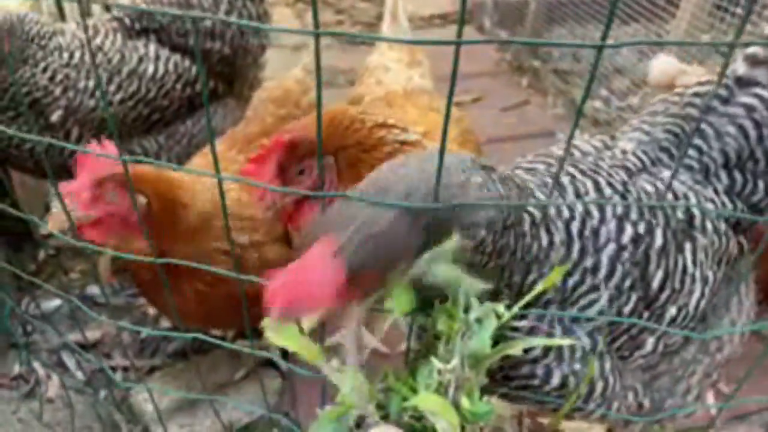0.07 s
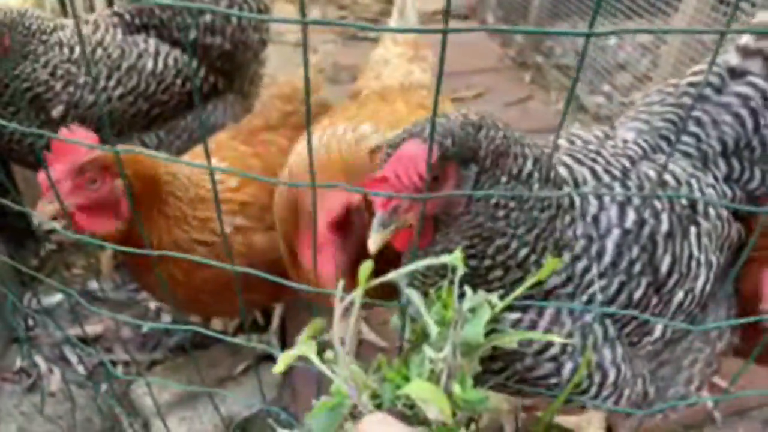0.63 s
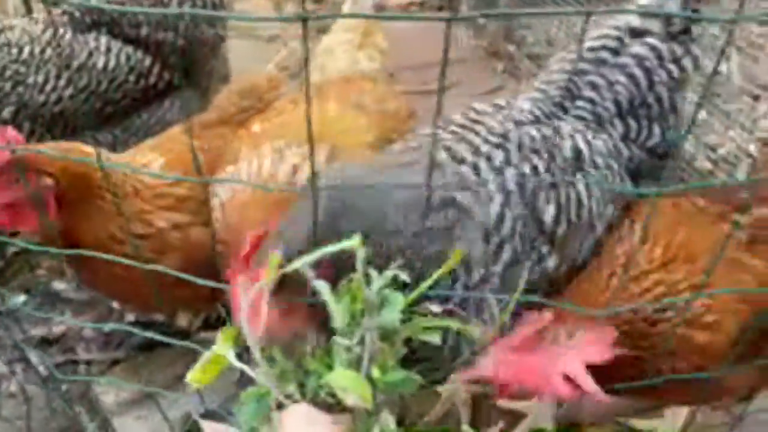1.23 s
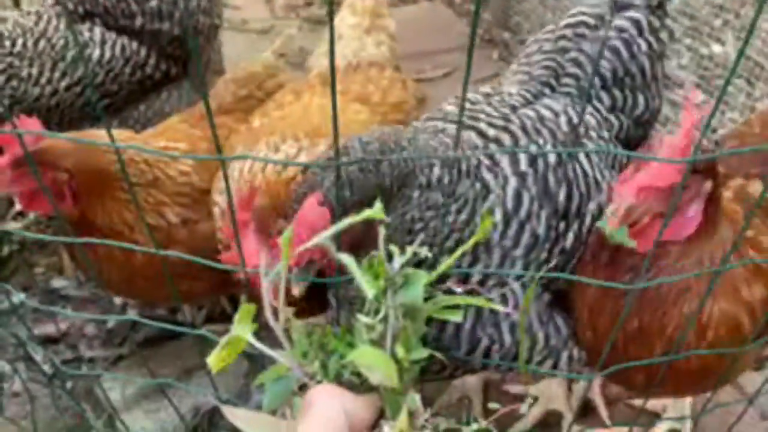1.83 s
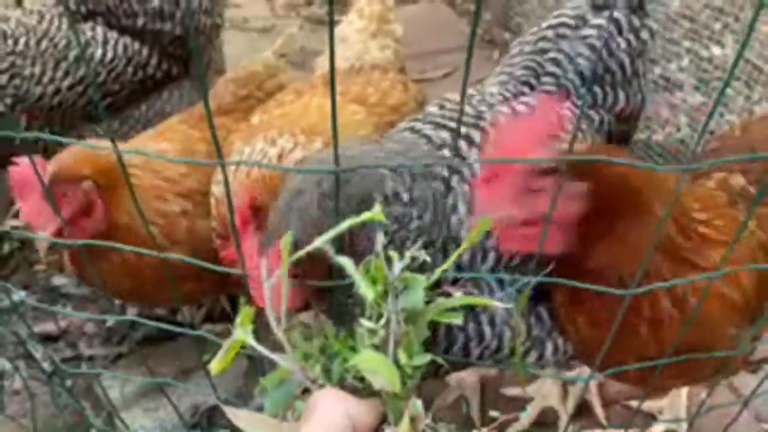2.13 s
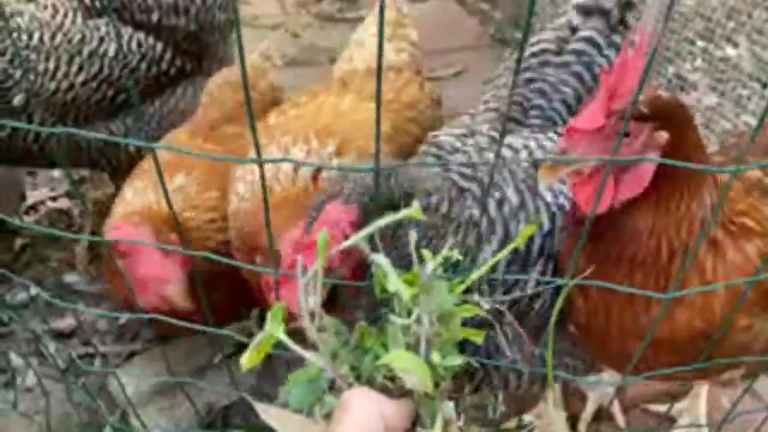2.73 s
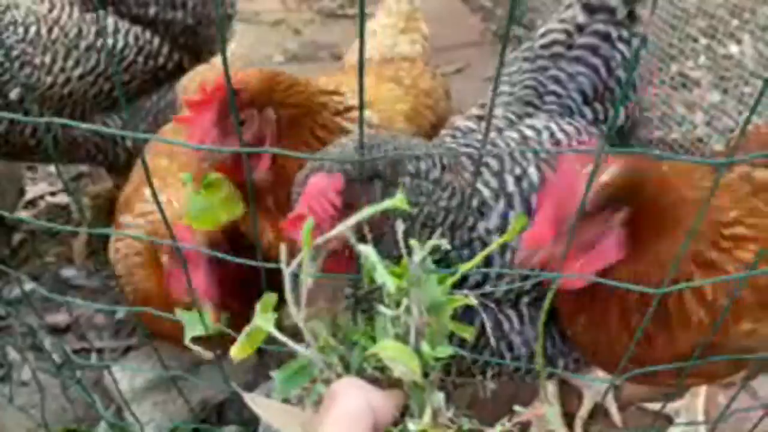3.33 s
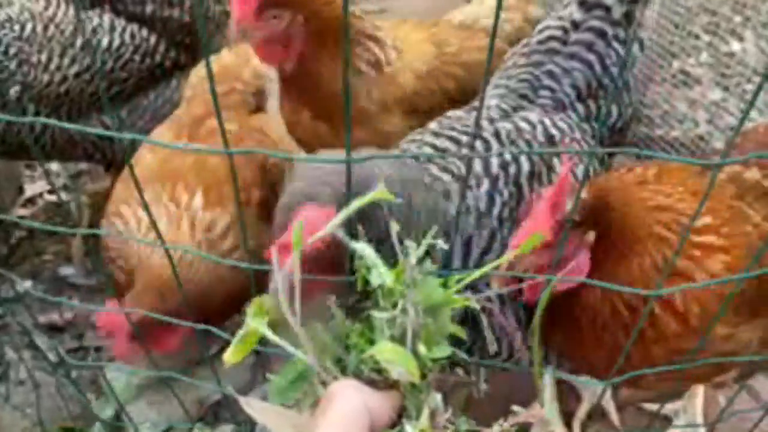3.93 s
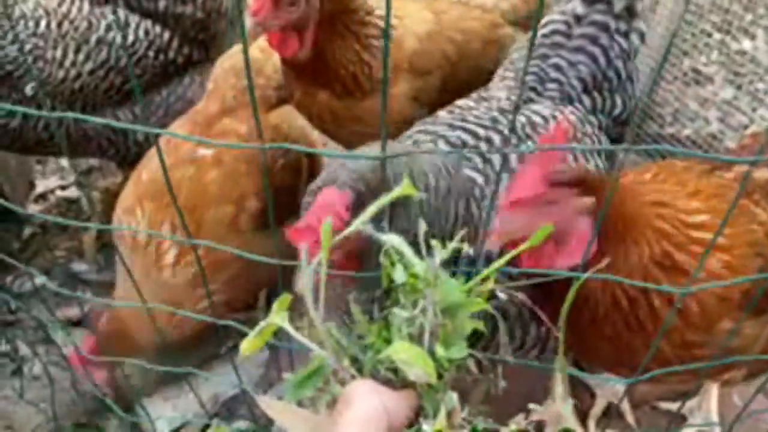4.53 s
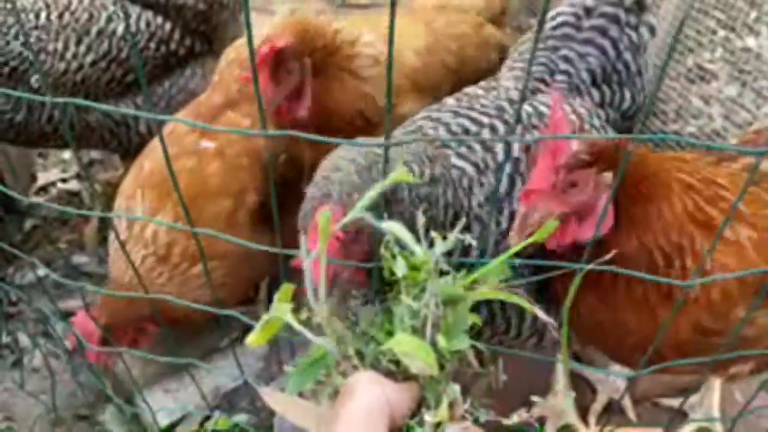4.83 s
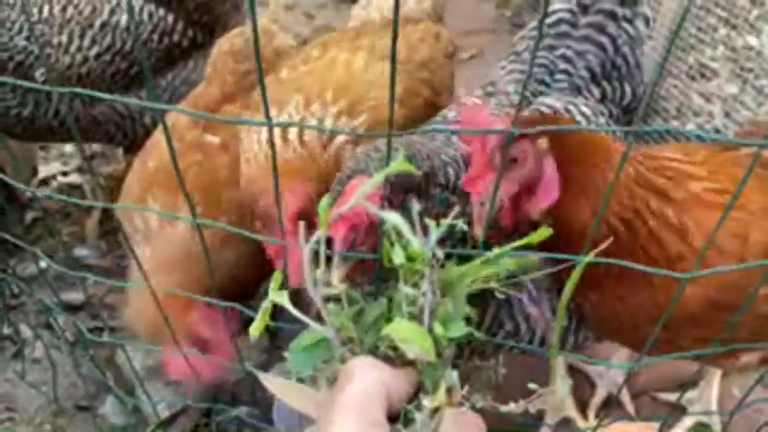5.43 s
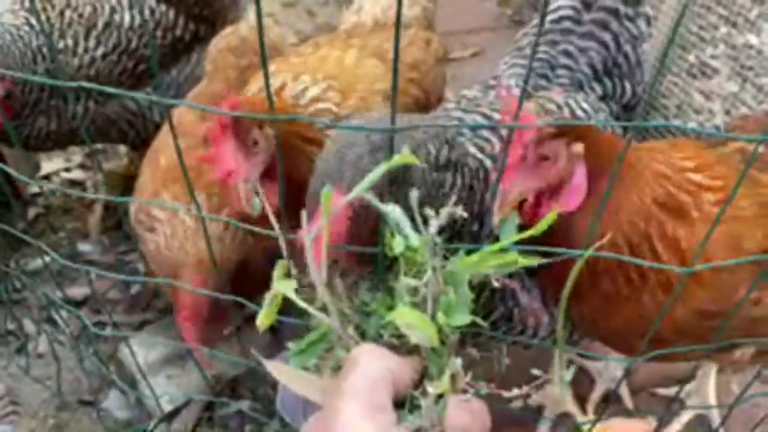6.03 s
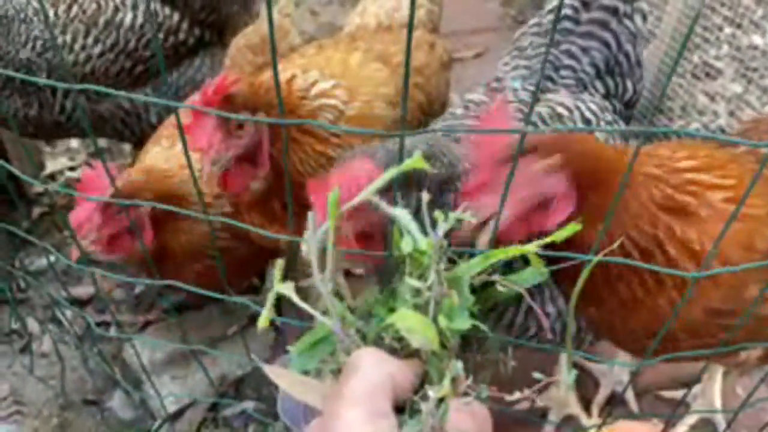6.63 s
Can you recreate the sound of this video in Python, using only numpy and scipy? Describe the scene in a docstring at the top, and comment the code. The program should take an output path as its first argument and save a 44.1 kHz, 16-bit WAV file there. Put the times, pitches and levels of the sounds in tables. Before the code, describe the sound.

Hens feed close to the microphone in a yard, their beaks clicking irregularly and leaves crackling faintly as they tug. A thin, quavering call climbs early, and pecking carries on until a few low clucks and two further rising calls. Everything cuts out briefly twice before two closing clucks. High, pulsing insect chirring and a faint far rumble lie behind it all.

```python
"""A backyard with hens at a wire fence. From the start a distant rumble and machine hum lie under a far
insect chorus, and three insects chirr in the trees, each swelling at its own pace. Almost at once the
hens tug crackling weeds and peck, each strike ringing the beak; a thin call rises from a hen's syrinx.
Past the middle come low clucks and two more rising calls. Late on, the whole sound drops out twice,
and two last clucks follow."""
import sys
import numpy as np
from scipy import signal
from scipy.fft import rfft, irfft, next_fast_len
from scipy.io import wavfile
from scipy.ndimage import map_coordinates

SR = 44100
rng = np.random.default_rng(int(sys.argv[2]) if len(sys.argv) > 2 else 0)


def to_wav(sig):
    """Store sig (one row per channel, or 1-D mono) as 16-bit WAV at the path in sys.argv[1].

    Samples outside -1..1 are clipped; the rate is SR.
    """
    pcm = np.clip(np.atleast_2d(sig), -1, 1) * 32767
    pcm = np.round(pcm).astype(np.int16)
    wavfile.write(sys.argv[1], SR, pcm.T)  # frames by channels


N = 294486

# spectrum of the chirr, near and far: f/Hz, relative spectral level/dB
CHIRR_SPECTRUM = [(4800, -38.5), (5700, -25.5), (6500, -14), (7050, -5), (7700, -5), (7930, -5), (8100, -1),
                  (8700, -1.5), (9600, -4), (10500, -10), (11300, -19), (12500, -28), (15500, -32.5)]


def amp(db):
    """Amplitude ratio of a level in decibels."""
    return 10 ** (np.asarray(db) / 20)


def unit(x):
    """Normalisation to rms 1."""
    return x / np.sqrt(np.mean(x ** 2) + 1e-20)


def along(points, hz):
    """Interpolation of (f/Hz, value) points on a logarithmic frequency axis."""
    f, values = np.transpose(points)
    return np.interp(np.log(hz + 1), np.log(f + 1), values)


def clock():
    """Uniform sampling: t/s of every sample."""
    return np.arange(N) / SR


def span(start, end):
    """Uniform sampling: t/s between two moments."""
    return np.arange(int(start * SR), int(end * SR)) / SR


def wobble(rate, size=N):
    """Slow random modulation: a spline through Gaussian values, rate knots a second."""
    knots = rng.standard_normal(int(size * rate / SR) + 4)
    return map_coordinates(knots, [np.arange(size) * rate / SR], order=2)


def filtered(x, response):
    """Linear filtering: the spectrum of x times a frequency response."""
    size = next_fast_len(N + 8192)
    return irfft(rfft(x, size) * response(np.fft.rfftfreq(size, 1 / SR)), size)[:N]


def coloured(x, spectrum):
    """Spectral shaping by (f/Hz, level/dB) points, at rms 1."""
    return unit(filtered(x, lambda hz: amp(along(spectrum, hz))))


def yard():
    """Broadband rumble and air hiss, plus the line spectrum of far machinery, wavering in level and phase."""
    rumble_spectrum = [(25, -53), (45, -29.5), (75, -8.5), (125, -3.5), (175, -3), (230, -2), (400, -6),
                       (650, -12.5), (950, -21.5), (1300, -20.5), (2000, -27.5), (5000, -31.5), (7000, -46)]  # distant background: f/Hz, relative spectral level/dB
    hum_lines = [(57, -89.5), (114, -73), (143, -74), (241, -72.5), (1183, -84.5), (1302, -99)]  # machine tones: f/Hz, level/dB
    air_spectrum = [(1500, -14.5), (4500, -10.5), (8000, 4.5), (15000, -7.5)]  # f/Hz, relative level/dB
    rumble = amp(-64.5 + 0.65 * wobble(7)) * coloured(rng.standard_normal(N), rumble_spectrum)
    air = amp(-70.5) * coloured(rng.standard_normal(N), air_spectrum)
    hum = np.zeros(N)
    for hz, db in hum_lines:
        peak = np.sqrt(2) * amp(db + 1.5 * wobble(5))
        hum += peak * np.sin(2 * np.pi * hz * clock() + 1.27 * wobble(6))
    return rumble + air + hum


def buzz(tilt_db_per_octave, grain_db):
    """Very fast clicks fuse into a hiss: grainy noise with the chirr spectrum, tilted to set its tone."""
    def response(hz):
        octaves = np.log2(np.clip(hz, 6500, 12000) / 8500)
        return amp(along(CHIRR_SPECTRUM, hz) + tilt_db_per_octave * octaves)
    clicks = rng.standard_normal(N) * amp(grain_db * wobble(600))
    return unit(filtered(clicks, response))


def insects(sharpness, uneven_db, chorus_db, sway_db):
    """Amplitude modulation at unequal rates: three buzzes drift in and out of step over a far chorus."""
    # near insects: first swell t/s, level at the top of a swell/dB, tilt/(dB per octave)
    singers = [(0.095, -52, 5.5), (0.1, -53.5, -9), (.067, -51, 1.3)]
    swell_rates = [(0, 9.75, 9.05, 10.24), (1.67, 9.73, 8.93, 6.95), (3.34, 9.6, 8.59, 7.85),
                   (5.01, 9.6, 9.16, 8.48), (6.68, 9.83, 7.68, 8.18)]  # drifting swell rates: t/s, then f/Hz for each insect
    whine_bands = [(7116, -69), (8269, -65), (8658, -67), (8860, -67)]  # narrow noise bands in the chorus: f/Hz, level/dB
    t = clock()
    times, *rates = np.transpose(swell_rates)
    near = np.zeros(N)
    for (first, db, tilt), rate in zip(singers, rates):
        cycles = np.cumsum(np.interp(t, times, rate)) / SR
        swell = np.abs(np.cos(np.pi * (cycles - np.interp(first, t, cycles)))) ** sharpness
        near += amp(db + uneven_db * wobble(12)) * swell * buzz(tilt, grain_db=1.5)
    chorus = amp(chorus_db + sway_db * wobble(36)) * coloured(rng.standard_normal(N), CHIRR_SPECTRUM)
    whines = sum(amp(db) * np.real((wobble(60) + 1j * wobble(60)) * np.exp(2j * np.pi * hz * t))
                 for hz, db in whine_bands)
    return near + chorus + whines


def leaves(crackle_db, clump_db, shuffle_db, edge_s):
    """Fracture noise: tugged leaves tear in clumps of crackle, while feet shuffle faintly in the litter."""
    tugs = [(.207, 0.023, -64), (1.294, 0.087, -71), (2.223, .067, -67.5), (2.725, 0.04, -67.5),
            (2.797, 0.037, -64.5), (3.098, 0.07, -70), (3.397, 0.071, -63.5), (3.475, 0.058, -62.5),
            (4.241, .071, -71.5), (4.458, .145, -65), (4.975, .056, -65), (5.236, 0.048, -67),
            (5.284, 0.193, -74.5), (5.785, 0.066, -67.5), (6.33, .041, -75)]  # pulls at the weeds: t/s, duration/s, level/dB
    leaf_spectrum = [(600, -21), (1300, 0.5), (1900, -7), (2500, -2.5), (3700, -3.5), (5200, -1),
                     (8000, -13.5), (14000, -18)]  # tearing leaves: f/Hz, relative spectral level/dB
    t = clock()
    effort = sum(amp(db) * np.clip(np.minimum(t - start, start + length - t) / edge_s, 0, 1)
                 for start, length, db in tugs)
    shuffle = amp(shuffle_db + 4.3 * wobble(16))
    fibres = rng.standard_normal(N) * amp(crackle_db * wobble(1400) + clump_db * np.tanh(wobble(180)))
    return (effort + shuffle) * coloured(fibres, leaf_spectrum)


def ringing(x, modes):
    """Modal response: x convolved with damped sinusoids, scaled so that a unit impulse peaks at 1."""
    t = np.arange(SR // 20) / SR
    ring = sum(amp(db) * np.exp(-np.pi * width * t) * np.sin(2 * np.pi * hz * t)
               for hz, width, db in modes)
    return signal.fftconvolve(x, ring / np.abs(ring).max())[:N]


def pecks(crack_s, splinter, knock_hz, knock_width_hz, stray_count):
    """Impact excitation: an impulse with a splintering tail rings the beak and knocks on the stalk."""
    strikes = [(.213, -40, -80), (.308, -50.5, -70), (.44, -55.5, -71), (1.309, -43.5, -67),
               (1.338, -39, -59), (1.352, -41.5, -69), (1.36, -42, -73), (2.265, -46.5, -72),
               (2.276, -47.5, -71), (2.808, -52, -71), (3.141, -51, -53.5), (3.303, -58, -56),
               (3.505, -38, -70), (4.288, -46, -49), (4.422, -51, -47), (4.981, -50.5, -67),
               (5.056, -52.5, -65), (5.253, -44, -68), (5.768, -51.5, -65), (5.812, -57, -55),
               (5.822, -60, -53.5), (5.965, -49, -70), (6.353, -49.5, -55.5)]  # sharp pecks: t/s, beak level/dB, stalk level/dB
    beak_modes = [(2910, 340, 0.5), (3690, 197, 5), (4730, 340, 5.5), (5600, 250, -1), (13700, 4000, 5)]  # resonances of a strike: f/Hz, bandwidth/Hz, relative level/dB
    stray_beak_db, stray_stalk_db, spread_db = -59, -74, 4  # fainter pecks at random times
    strays = [(when * N / SR, stray_beak_db + spread_db * force, stray_stalk_db + spread_db * force)
              for when, force in rng.uniform([0, -1], [1, 1], (stray_count, 2))]
    taps = np.zeros((2, N + SR))
    t = np.arange(SR // 50) / SR
    for start, beak_db, stalk_db in strikes + strays:
        tail = rng.standard_normal(len(t)) * np.exp(-t / crack_s)
        crack = (t == 0) + splinter * tail / np.linalg.norm(tail)
        onset = round(start * SR)
        taps[:, onset:onset + len(t)] += np.outer(amp([beak_db, stalk_db]), crack)
    return ringing(taps[0], beak_modes) + ringing(taps[1], [(knock_hz, knock_width_hz, 0)])


def syrinx(t, pitch, db, slope_db, rough, edge_s, jitter=.01, flutter_db=1.5, rasp=0.77, purity_db=-20):
    """Source and filter: the throat shapes the syrinx's harmonics; roughness smears each line."""
    throat_response = [(200, -2.5), (420, 2), (620, -8.5), (820, -5), (1080, -12), (1350, -5.5), (1580, -9),
                       (1760, -1), (2300, -21.5), (3500, -15)]  # the hen's vocal tract: f/Hz, gain/dB
    size = len(t)
    pitch = pitch * (1 + jitter * (1 + 5 * rough) * wobble(168.4, size))
    phase = 2 * np.pi * np.cumsum(pitch) / SR
    voice = np.zeros(size)
    for k in range(1, 19):
        thinning_db = purity_db * max(k - 2, 0) * (pitch / 500) ** 3  # high notes lose upper harmonics
        source_db = slope_db * (k - 1) ** 1.06 + thinning_db
        gain = amp(source_db + along(throat_response, k * pitch) - along(throat_response, pitch))
        sidebands = rasp * rough * np.sqrt(k) * wobble(500, size) * np.cos(k * phase)
        voice += gain * (np.sin(k * phase) + sidebands)
    edges = np.clip(np.minimum(t - t[0], t[-1] - t) / edge_s, 0, 1)
    call = np.sqrt(2) * voice * edges * amp(db + flutter_db * wobble(70.9, size))
    return np.pad(call, (round(t[0] * SR), N))[:N]


def rising_calls(base_rough, glide_rough, quaver_rate, quaver_share, quaver_db):
    """Frequency modulation: thin notes climb and quaver, and roughen where the pitch moves fast."""
    # one contour a call: t/s, fundamental f/Hz, level/dB, source slope to the second harmonic/dB
    contours = [
        [(.374, 520, -51, -4), (.41, 526, -51.5, -3.5), (.44, 597.6, -60.5, -9), (.47, 595, -66.5, -13),
         (.51, 626, -61, -14), (.555, 655, -71.5, -3), (.578, 726, -63, -9), (.62, 651, -63.5, -14),
         (.7, 721, -62, -13), (.782, 752, -61, -8.5), (.85, 630, -61.5, -6), (.863, 940, -67, -20),
         (.882, 760, -75, -18)],
        [(4.302, 399, -56, 3.5), (4.338, 402, -57, -0.5), (4.36, 414, -54, -2.5), (4.44, 439, -55.5, -6),
         (4.49, 508, -58, -20), (4.513, 533, -68, -22)],
        [(4.518, 642, -65, -9), (4.555, 735, -65.5, -9), (4.65, 790, -61, -17), (4.75, 809, -62.5, -21),
         (4.84, 902, -66, -12.5), (4.96, 865, -61, -28), (4.995, 920, -63, -25), (5.06, 888, -57.5, -27),
         (5.15, 950, -64, -26)],
    ]
    out = np.zeros(N)
    for contour in contours:
        times, *columns = np.transpose(contour)
        t = span(times[0], times[-1])
        pitch, db, slope_db = [np.interp(t, times, column) for column in columns]
        octaves_per_s = np.abs(np.gradient(np.log2(pitch))) * SR
        rough = np.minimum(base_rough + glide_rough * octaves_per_s, .5)
        quaver = wobble(quaver_rate, len(t))
        pitch *= 1 + quaver_share * quaver
        out += syrinx(t, pitch, db + quaver_db * quaver, slope_db, rough, edge_s=0.0097)
    return out


def clucks(start_hz, attack_s, onset_db, fade_db, slope_db, base_rough, onset_rough):
    """Voiced transients: each leaps up from a low rasp, clears, and fades as its pitch sinks."""
    # clucks: t/s, duration/s, rise time/s, top f/Hz, end f/Hz, level/dB
    notes = [(3.797, 0.05, 0.031, 347.5, 255, -43), (4.179, 0.021, .01, 240, 205, -51.5),
             (4.215, .092, .008, 429, 245, -52.5), (6.409, 0.021, 0.019, 247, 215, -47.5),
             (6.621, .062, 0.019, 388, 304, -47)]
    out = np.zeros(N)
    for start, length, rise, top_hz, end_hz, db in notes:
        t = span(start, start + length)
        age = t - start
        opening = np.minimum(age / attack_s, 1)
        sinking = np.clip((age - rise) / (length - rise), 0, 1)
        leap_hz = np.interp(age, [0, rise], [start_hz, top_hz])
        pitch = leap_hz * (end_hz / top_hz) ** (1 - (1 - sinking) ** 1.4)
        level_db = db + onset_db * (1 - opening) + fade_db * (age / length) ** 2
        rough = base_rough + onset_rough * (1 - opening)
        out += syrinx(t, pitch, level_db, slope_db * opening, rough, edge_s=0.0058)
    return out


def reverberation(x, t60_s):
    """Diffuse scattering from ground and coop: a short tail that decays exponentially."""
    t = np.arange(SR // 3) / SR
    tail = rng.standard_normal(len(t)) * amp(-60 * t / t60_s) * (t > .004)
    return signal.fftconvolve(x, tail / np.linalg.norm(tail))[:N]


def scene():
    """Superposition: the close flock, its faint tail, the insects and the yard, alike in both channels."""
    flock = pecks(crack_s=0.0023, splinter=0.74, knock_hz=1520, knock_width_hz=300, stray_count=12)
    flock += rising_calls(base_rough=.13, glide_rough=0.014,
                          quaver_rate=39.9, quaver_share=.01, quaver_db=1.5)
    flock += clucks(start_hz=189.7, attack_s=.014, onset_db=-9, fade_db=-8, slope_db=-3,
                    base_rough=.1, onset_rough=0.4)
    flock += leaves(crackle_db=4.5, clump_db=3.5, shuffle_db=-83, edge_s=0.0086)
    scattered = amp(-15) * reverberation(flock, t60_s=.18)
    chirr = insects(sharpness=1.63, uneven_db=1.03, chorus_db=-52, sway_db=1.35)
    mono = flock + scattered + chirr + yard()
    return np.array([mono, mono])


def record(dry):
    """Gating and band limiting: the sound twice fades fast and cuts back in, and the top treble is cut."""
    # gaps in the sound: fade t/s, return t/s, fade rate/(dB per s), duration of the return/s
    dropouts = [(5.446, 5.754, 377, 0.0048), (5.825, 5.917, 477, .015)]
    cutoff_hz = 15700
    t, gain = clock(), np.ones(N)
    for start, back, fade_db_per_s, return_s in dropouts:
        fade = amp(-fade_db_per_s * np.maximum(t - start, 0))
        gain *= np.maximum(fade, np.clip((t - back) / return_s, 0, 1))
    return np.array([filtered(channel * gain, lambda hz: hz < cutoff_hz) for channel in dry])


dry = scene()
out = record(dry)
to_wav(out)
```